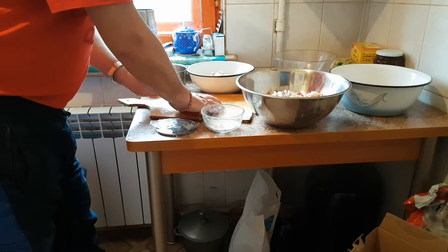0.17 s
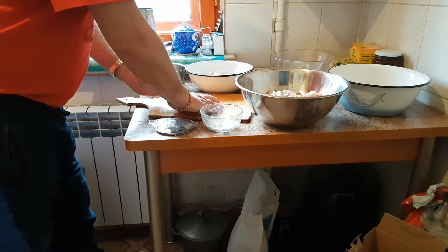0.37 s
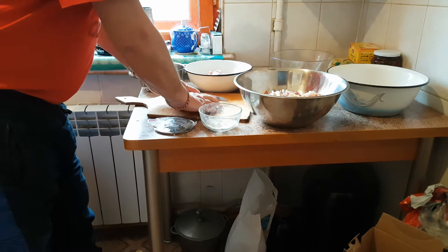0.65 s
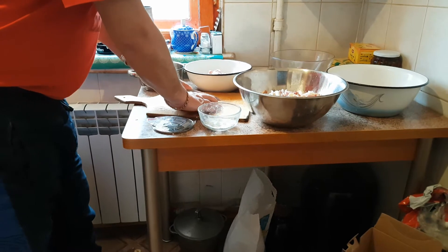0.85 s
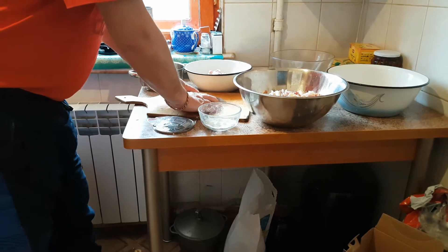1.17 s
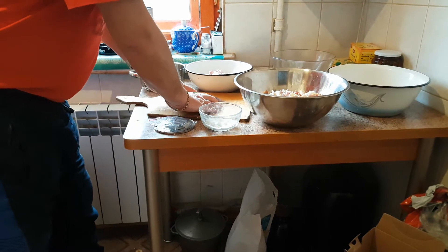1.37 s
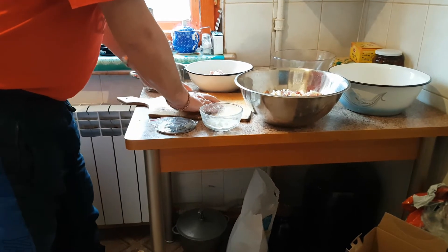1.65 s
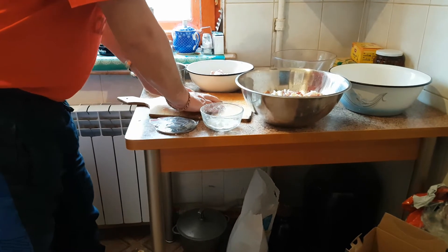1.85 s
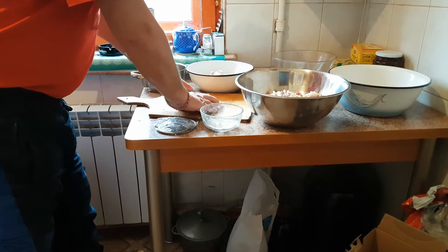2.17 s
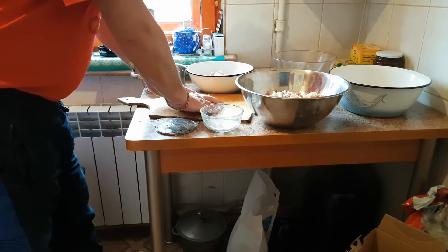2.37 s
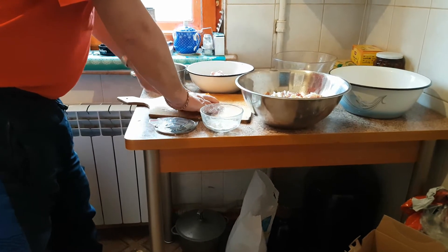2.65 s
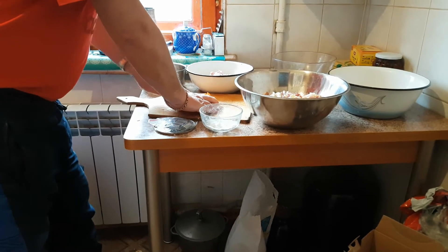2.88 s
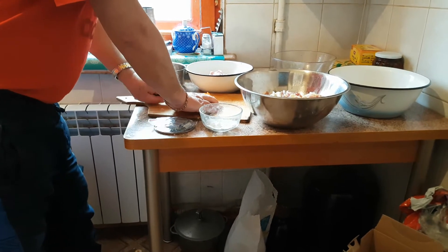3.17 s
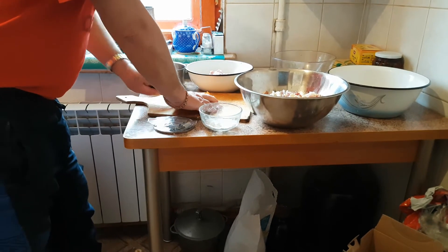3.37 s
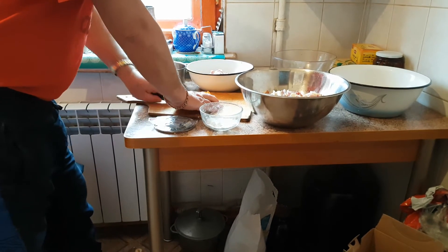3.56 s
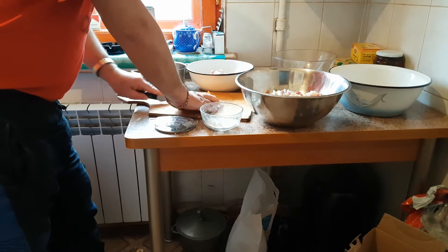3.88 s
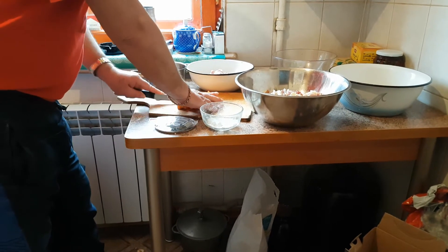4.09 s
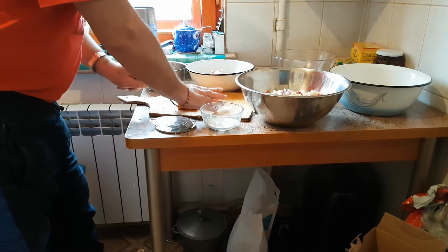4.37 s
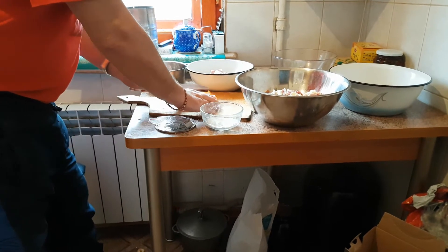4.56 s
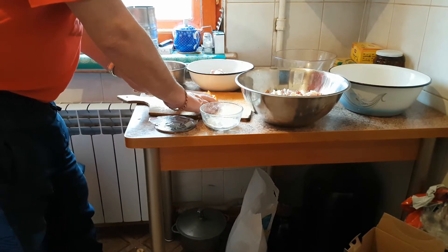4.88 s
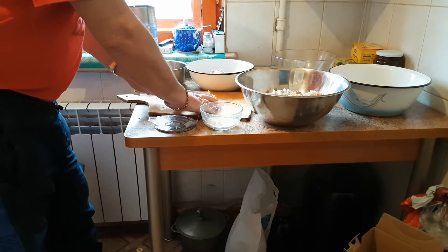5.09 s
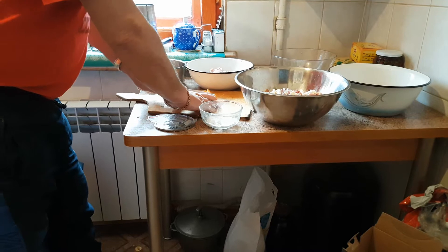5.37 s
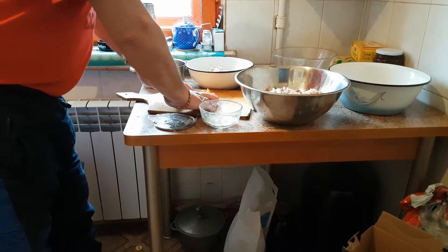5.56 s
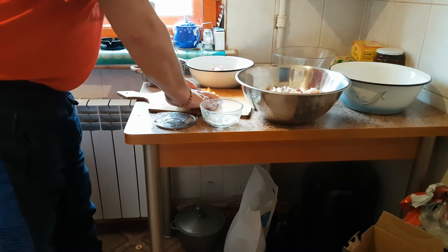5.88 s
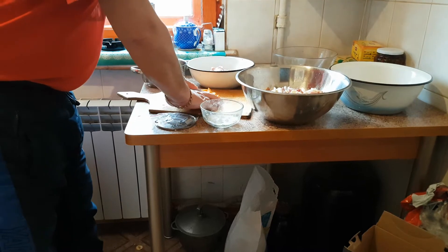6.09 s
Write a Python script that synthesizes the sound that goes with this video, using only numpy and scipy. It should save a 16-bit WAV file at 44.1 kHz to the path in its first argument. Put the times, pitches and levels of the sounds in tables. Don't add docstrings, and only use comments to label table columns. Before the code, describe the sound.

Sparse, uneven cutting sounds: gritty blade drags, light ticks against wood and muffled low bumps of the table. Two hard woody knocks stand out around the middle, the second louder, each with quick bounces and a short tiled-room echo. After a short scraping swipe only faint touches and rustles remain over soft room noise and a low, throbbing fridge hum, heard by a nearby stereo recorder.

```python
import sys
import numpy as np
from scipy import signal
from scipy.io import wavfile

SR = 44100
rng = np.random.default_rng(int(sys.argv[2]) if len(sys.argv) > 2 else 0)


def voltage_ratio(level):
    return 10 ** (np.asarray(level, float) / 20)


def dump(signal):
    limited = np.clip(np.atleast_2d(signal).T, -1, 1)
    pcm = np.round(limited * 32767).astype(np.int16)
    wavfile.write(sys.argv[1], SR, pcm)


N = 274946

# t/s, level/dB
CHOP_BLOWS = [
    [(2.6908, 16.5), (2.697, 6.5), (2.7132, 9)],
    [(3.6044, 21), (3.6115, 11.5), (3.618, 10), (3.6262, 16.5), (3.639, 8), (3.659, 9.5), (3.676, 6)],
]
# f/Hz, level/dB per Hz
CHOP_COLOURS = [
    [(120, -52), (200, -24.5), (278, -12), (340, -31.5), (579, -11.5), (867, -10.5), (1140, 1),
     (1710, -5.5), (2910, -14.5), (4430, -34.5), (7680, -32), (9060, -48), (16000, -50)],
    [(120, -51.5), (200, -27.5), (500, -12), (623, -15), (749, -9), (867, -6.5), (1020, 1.5), (2560, 4),
     (4270, -15.5), (7970, -22.5), (9060, -41), (14600, -44.5), (16000, -68)],
]
# f/Hz, level/dB, t60/s
BOARD_MODES = [(540, -7.5, 0.033), (718, -4.5, .04), (1020, -10, 0.062), (1177, -4.5, 0.053),
               (1250, -7, .05), (1570, -3.5, 0.026), (1860, -8.5, 0.018), (2160, -13.5, 0.025),
               (2680, -10.5, 0.015), (3090, -4.5, 0.014)]

# t/s, peak level/dB, relative level above 3.5 kHz/dB, f of the spot struck/Hz
KNOCKS = [(0.651, -47, -3.5, 990), (0.658, -53, -11, 1150), (0.97, -46.5, 8.5, 1260),
          (1.025, -46, 20, 2020), (1.037, -31, 16.5, 1940), (1.066, -29, 18, 1860), (1.097, -43, 11, 2500),
          (1.229, -41, 6, 1170), (1.539, -60, 0, 2820), (2.006, -55, 13, 2770), (2.237, -84, 21, 1800),
          (2.26, -44.5, 12, 1760), (2.302, -37.5, 9, 2450), (2.308, -29.5, -3, 1150),
          (2.342, -36, 12, 2460), (2.376, -40.5, 12, 1880), (2.386, -24, -4, 1124), (2.68, -32, 19.5, 1810),
          (2.754, -39.5, 17, 1240), (2.784, -29, 15.5, 1480), (3.176, -51.5, 4, 2348),
          (3.52, -59, -2, 2710), (3.574, -35.5, 2, 1860), (3.598, -35.5, 18, 1800),
          (4.613, -60, 21.5, 2310), (4.899, -58, 12.5, 1042), (5.52, -44, 0, 1020),
          (5.845, -57.5, -1.5, 2480), (5.977, -49.5, -0.5, 838)]
# f/Hz, level/dB per Hz
KNOCK_COLOUR = [(200, -38.5), (700, -10.5), (1150, -3), (1800, -5.5), (2600, 5), (4000, -16), (5000, -11),
                (8000, -19), (9500, -34), (16000, -41)]
KNOCK_LOW_DB, KNOCK_CRACK_DB = -5.5, 0.5
SPOT_LOW_DB_PER_OCTAVE = -2.5

# f/Hz, level/dB per Hz
DRAG_COLOUR = [(150, -56), (250, -11), (761, -3), (831, -5), (922, -9.5), (1140, 0.5), (1330, -11.5),
               (1880, -5.5), (3280, -15.5), (7570, -20), (9010, -22.5), (13000, -24.5), (16000, -26.5)]
# t/s, level/dB, fade/s per 20 dB, relative bright rasp level/dB, relative dull rub level/dB
BITES = [(0.643, -40.5, 0.0855, -5, -10.5), (0.972, -51, 0.09, -12, -5.5),
         (1.038, -37.5, 0.0578, -1.5, -13), (1.064, -39.5, 0.1219, -5, -18), (1.226, -41.5, 0.03, -20, -11),
         (2.259, -52.5, 0.16, -6, -13), (2.304, -38.5, 0.1135, -5, -20), (2.343, -42.5, 0.0766, -3, -12),
         (2.788, -33.5, 0.0566, -6.5, -9), (3.147, -52, 0.16, -11, -6.5), (3.571, -38, 0.0958, -3, -13.5),
         (3.61, -43, .3, -13.5, -12), (5.388, -56.5, 0.54, -14, -10), (5.525, -52, 0.02, -10, -9)]
BITE_RISE_S = 0.008
# t of giving/s, level/dB, swell/s per 20 dB, relative bright rasp level/dB, relative dull rub level/dB
PUSHES = [
    (0.631, -48, 0.36, -10.5, -13.5),
    (0.668, -43, 0.01, -3, -14),
    (1.106, -40, 0.0142, 2.5, -18),
    (1.914, -46, 0.11, -8.5, -14.5),
    (2.401, -36, 0.1419, -8.5, -13.5),
    (2.551, -51.5, 0.08, -9, -13.5),
    (2.761, -35, 0.0839, -11.5, -14),
    (3.183, -47.5, 0.07, -7.5, -13.5),
    (5.721, -58, 0.66, -11, -5.5),
    (5.779, -55, 0.16, -9, -12),
]
PUSH_FADE_S = 0.035
# t/s, level/dB, swell and fade/s per 20 dB
SHIFTS = [(.33, -64, 0.23), (.84, -57.5, 0.25), (1.47, -60, 0.14), (1.57, -73, .1), (1.68, -57.5, 0.26),
          (2.099, -60.5, 0.1), (3.059, -63.5, 0.9), (3.361, -62.5, 0.3), (4.167, -63, 0), (4.57, -67, 0.3),
          (5.17, -70.5, 0), (5.996, -64.5, 0.5), (6.22, -71.5, 0.3)]
SHIFT_BRIGHT_DB, SHIFT_DULL_DB = -10.5, -7.5

# start t/s, end t/s, start level/dB, end level/dB
SWEEPS = [
    (3.861, 3.97, -48.5, -47.5),
    (5.653, 5.784, -65.5, -56.5),
]
SWEEP_RISE_S, SWEEP_FADE_S = 0.012, 0.048
# f/Hz, level/dB, t60/s
SWEEP_RINGS = [(1120, -1.5, 0.015), (1850, -6.5, 0.0045), (2600, -4, 0.0055), (5140, -18.5, 0.0016),
               (7600, -27.5, 0.0018)]
# f/Hz, level/dB per Hz
SWEEP_COLOUR = [(300, -32), (900, 0.5), (8500, -1), (11000, -13)]

# t/s, peak level/dB, f/Hz
THUMPS = [(0.766, -58, 148), (0.862, -53.5, 102), (0.951, -52, 213), (1.05, -53, 113), (1.119, -55.5, 122),
          (1.239, -53.5, 151), (1.612, -42.5, 132), (1.72, -52.5, 96.9), (1.83, -51, 137),
          (2.021, -50, 129), (2.069, -55, 129), (2.149, -53, 96), (2.307, -52, 146), (2.41, -45, 137),
          (2.463, -48, 129), (2.51, -48.5, 132), (2.702, -35.5, 151), (2.792, -40, 132),
          (3.185, -36.5, 140), (3.3, -52, 132), (3.34, -47, 129), (3.608, -39, 132), (3.667, -42, 153),
          (4.001, -43.5, 135), (4.059, -51, 140), (5.329, -54, 91.5), (6.086, -48.5, 145)]
TABLE_T60_S = 0.19

# f/Hz, t60/s
ROOM_T60 = [(200, 0.17), (600, 0.31), (1200, 0.35), (2500, 0.35), (5000, .33), (10000, 0.23)]
# f/Hz, left-right level/dB
PORTS = [(60, -0.5), (120, 0), (240, 0.5), (480, -0.5), (950, 2.5), (1890, -7), (3770, -6), (7520, -10),
         (15000, 3.5)]
# f/Hz, left-right likeness (0-1)
LIKENESS = [(30, .9), (100, .96), (250, .9), (400, .7), (700, .3), (1200, .05), (8000, .01)]
RIGHT_LAG = 4
# f/Hz, width/Hz, level/dB
PORT_PEAKS = [(4300, 760, -1), (5375, 1400, 3.5), (7680, 670, 6), (9150, 1200, -3)]
CUTOFF_HZ = 15850

# f/Hz, rms level/dB, throb depth (0-1)
HUM = [(97.5, -71.5, .85), (195, -82, .3), (290.7, -76, .15), (344.5, -80, .3), (586.8, -81, .1),
       (4011, -87.5, .1)]
THROB_PER_S, THROB_TOP_S = 2.265, 0.12
# f/Hz, level/dB per Hz
AIR = [(12, -43), (30, -16.5), (75, 0), (101, -12), (123, -4), (270, -6), (293, -4.5), (410, -14.5),
       (574, -12.5), (1220, -18), (2260, -15.5), (3340, -25.5), (3950, -26.5), (5530, -36), (16000, -33)]
# f/Hz, left-right level/dB
AIR_PORTS = [(60, -0.26), (180, 3), (550, -3), (1650, -5), (4970, -8), (15000, 1.2)]
AIR_DB = -63

EDGES = 22 * 2 ** np.arange(0, 9.7, 1 / 3)
CENTRES = np.sqrt(EDGES[1:] * EDGES[:-1])
BANK = [signal.butter(2, EDGES[k:k + 2], "band", fs=SR, output="sos") for k in range(len(CENTRES))]


def chops():
    out = 0
    rooms = [kitchen(colour, (1500, 3500), 0.00074, reverb=0.79) for colour in CHOP_COLOURS]
    luck = rng.standard_normal((2, 12, len(BOARD_MODES)))
    for blows, (direct, echoes), own in zip(CHOP_BLOWS, rooms, luck):
        struck = np.zeros(N)
        for (s, db), strengths in zip(blows, own):
            click, body = board(strengths)
            struck[round(s * SR):][:4096] += voltage_ratio(db) * body
        answer = np.sum(voltage_ratio(-5.5) * direct + echoes, axis=0, keepdims=True)
        out = out + heard(struck[None, None], answer)
    return out


def board(luck):
    click = np.zeros(4096)
    click[0] = 1
    body = click
    for own, (hz, db, t60) in zip(luck, BOARD_MODES):
        body = body + voltage_ratio(db - 35 + 2.5 * own) * ring(click, hz, t60)
    return click, body


def knocks():
    s, db, high_db, spot_hz = np.transpose(KNOCKS)
    low_db = KNOCK_LOW_DB + SPOT_LOW_DB_PER_OCTAVE * np.log2(spot_hz / 1500)
    starts = np.round(s * SR).astype(int) + 30
    luck = rng.standard_normal((30, len(BOARD_MODES)))
    struck = np.zeros((3, 1, N))
    for i, start in enumerate(starts):
        click, body = board(luck[i])
        body = body + voltage_ratio(-13) * ring(click, spot_hz[i], 0.011)
        gains = voltage_ratio(db[i] + 15 + np.array([low_db[i], 0, high_db[i]]))
        struck[..., start:start + 4096] += gains[:, None, None] * body
    direct, echoes = kitchen(KNOCK_COLOUR, (1500, 3500), 0.0023, reverb=0.9)
    direct[2] *= voltage_ratio(-4)
    return heard(struck, voltage_ratio(KNOCK_CRACK_DB) * direct + echoes)


def drag():
    sizes = voltage_ratio(3.6 * np.minimum(rng.exponential(1, N), 5)) * rng.choice([-1, 1], N)
    slips_per_s = 2500 * voltage_ratio(3.0 * drift(35))
    slips = rms_one(sizes * (rng.random(N) < slips_per_s / SR))
    modes = sum(voltage_ratio(db - 45.0) * ring(slips, hz, t60) for hz, db, t60 in BOARD_MODES)
    slips = rms_one(slips + modes)
    registers = voltage_ratio(np.array([[5.5], [1.0], [6.5]])) * pressure() * slips
    direct, echoes = kitchen(DRAG_COLOUR, (800, 3500), 0.00065, reverb=0.63)
    return heard(registers[:, None], voltage_ratio(-2.0) * direct + echoes)


def pressure():
    moves = [(s, db, BITE_RISE_S, fade, bright, dull) for s, db, fade, bright, dull in BITES]
    moves += [(s, db, swell, PUSH_FADE_S, bright, dull) for s, db, swell, bright, dull in PUSHES]
    moves += [(s, db, width, width, SHIFT_BRIGHT_DB, SHIFT_DULL_DB) for s, db, width in SHIFTS]
    t = np.arange(0, N + 32, 32) / SR
    power = 0
    for s, db, swell, fade, bright, dull in moves:
        level = db - 20 * np.maximum((s - t) / max(swell, 0.002), (t - s) / max(fade, 0.002))
        power = power + voltage_ratio(2 * (level + np.array([[dull], [0], [bright]])))
    return np.array([np.interp(np.arange(N) / SR, t, np.sqrt(row)) for row in power])


def sweep():
    t = np.arange(N) / SR
    gain = 0
    for start, end, first_db, last_db in SWEEPS:
        outside = np.maximum(0, np.maximum((start - t) / SWEEP_RISE_S, (t - end) / SWEEP_FADE_S))
        gain = gain + voltage_ratio(np.interp(t, [start, end], [first_db, last_db]) - 20 * outside)
    sizes = voltage_ratio(4.3 * np.minimum(rng.exponential(1, N), 5)) * rng.choice([-1, 1], N)
    slips = sizes * (rng.random(N) < 2000 / SR)
    rings = sum(voltage_ratio(db) * rms_one(ring(slips, hz, t60)) for hz, db, t60 in SWEEP_RINGS)
    rubbed = gain * (voltage_ratio(-11) * rms_one(slips) + rings)
    direct, echoes = kitchen(SWEEP_COLOUR, (800, 3500), 0.00086, reverb=0.55)
    return heard(rubbed[None, None], np.sum(direct + echoes, axis=0, keepdims=True))


def thumps():
    out = np.zeros((2, N))
    boom_band = signal.butter(3, [85, 420], "band", fs=SR, output="sos")
    push = np.zeros(SR // 3)
    push[:200] = np.hanning(200)
    for s, db, hz in THUMPS:
        boom = ring(push, hz, TABLE_T60_S) * sides(0.1)
        boom = boom + voltage_ratio(-9.5) * ring(push, hz * 0.74, TABLE_T60_S * 1.3) * sides(-3.0)
        boom = boom + voltage_ratio(-10.0) * ring(push, hz * 1.5, TABLE_T60_S * 0.39) * sides(4.0)
        boom = signal.sosfilt(boom_band, boom)
        start = round(s * SR)
        out[:, start:start + len(push)] += (voltage_ratio(db) * boom / np.abs(boom).max())[:, :N - start]
    return out


def kitchen(colour, splits_hz, build_s, reverb):
    t = np.arange(int(0.5 * SR)) / SR
    white = rng.standard_normal((2, 2, len(t)))
    lumps = rng.standard_normal((2, len(t) // 90 + 1)).repeat(90, axis=1)[:, :len(t)]
    white = white * voltage_ratio(4.0 * lumps[:, None] * np.exp(-t / 0.06))
    crack = np.zeros((2, len(t)))
    crack[[0, 1], [0, RIGHT_LAG]] = 30
    direct, echoes = np.zeros((2, 3, 2, len(t)))
    for k, hz in list(enumerate(CENTRES))[9:]:
        decay = voltage_ratio(-60 * t / at_hz(ROOM_T60, hz) / reverb) * (1 - np.exp(-t / build_s))
        tail = pair(white[k % 2], hz) * decay
        register = np.searchsorted(splits_hz, hz)
        gain = voltage_ratio(at_hz(colour, hz)) * sides(at_hz(PORTS, hz))
        echoes[register] += gain * band(tail, k)
        direct[register] += gain * band(crack, k) * (-1) ** k
    return np.array([direct, echoes]) / np.sqrt(np.sum(echoes ** 2))


def heard(registers, answer):
    return signal.oaconvolve(registers, answer, axes=2)[..., :N].sum(axis=0)


def fridge():
    t = np.arange(N) / SR
    throb = np.cos(2 * np.pi * THROB_PER_S * (t - THROB_TOP_S))
    hum = 0
    for hz, db, depth in HUM:
        level = np.sqrt(2) * voltage_ratio(db + 1.5 * drift(4)) * (1 + depth * throb)
        hum = hum + level * np.sin(2 * np.pi * hz * t + 0.8 * drift(3))
    return hum


def air():
    white = rng.standard_normal((2, 2, N))
    together = drift(14)
    noise = 0
    for k, hz in enumerate(CENTRES):
        gain = voltage_ratio(at_hz(AIR, hz) + 1.2 * together + 1.5 * drift(13)) * sides(at_hz(AIR_PORTS, hz))
        noise = noise + gain * pair(band(white[k % 2], k), hz)
    return voltage_ratio(AIR_DB) * rms_one(noise)


def ring(clicks, hz, t60):
    r, w = voltage_ratio(-60 / (t60 * SR)), 2 * np.pi * hz / SR
    return signal.lfilter([0, np.sin(w)], [1, -2 * r * np.cos(w), r * r], clicks + 1e-18)


def pair(noises, hz):
    alike = np.clip(at_hz(LIKENESS, hz), 0, 1)
    return np.sqrt(1 + alike) * noises[0] + np.sqrt(1 - alike) * noises[1] * [[1], [-1]]


def sides(db):
    return voltage_ratio(np.array([[0.5], [-0.5]]) * db)


def drift(rate):
    knots = rng.standard_normal(int(N / SR * rate) + 2)
    return np.interp(np.arange(N) / SR * rate, np.arange(len(knots)), knots)


def band(x, k):
    return signal.sosfilt(BANK[k], x)


def at_hz(points, hz):
    f, value = np.array(points).T
    return np.interp(np.log(hz), np.log(np.maximum(f, 1)), value)


def rms_one(x):
    return x / np.sqrt(np.mean(x ** 2) + 1e-20)


def scene():
    return chops() + knocks() + drag() + sweep() + thumps() + fridge() + air()


def band_limit(x):
    return signal.sosfilt(signal.butter(12, 16490, fs=SR, output="sos"), x)


def record(dry):
    for hz, width, db in PORT_PEAKS:
        dry = dry + (voltage_ratio(db) - 1) * signal.lfilter(*signal.iirpeak(hz, hz / width, fs=SR), dry)
    rounded = 1.3 * np.tanh(dry / 1.3)
    low_pass = signal.cheby2(12, 30, CUTOFF_HZ * 1.015, fs=SR, output="sos")
    return band_limit(signal.sosfilt(low_pass, rounded))


dry = scene()
out = record(dry)
dump(out)
```